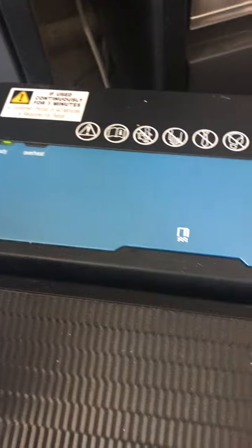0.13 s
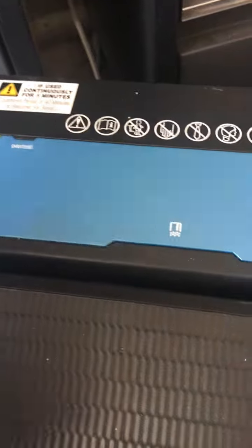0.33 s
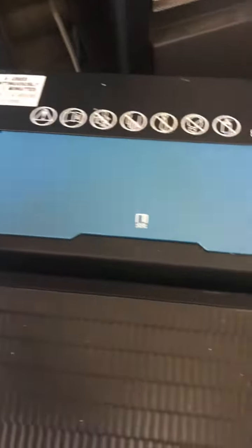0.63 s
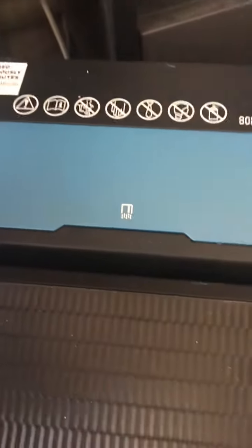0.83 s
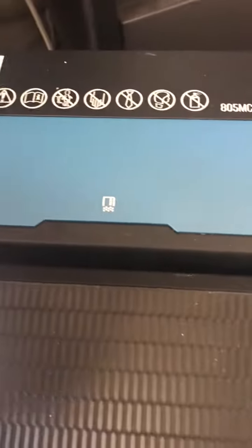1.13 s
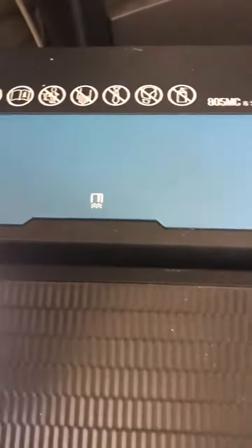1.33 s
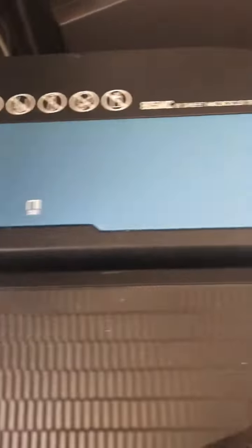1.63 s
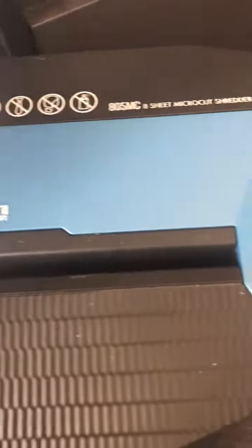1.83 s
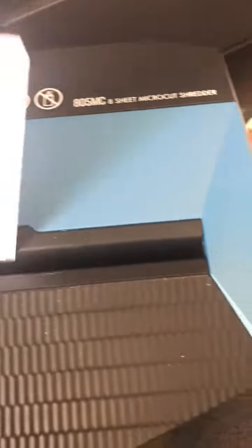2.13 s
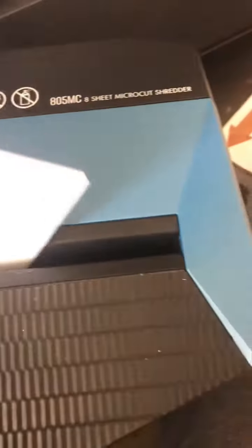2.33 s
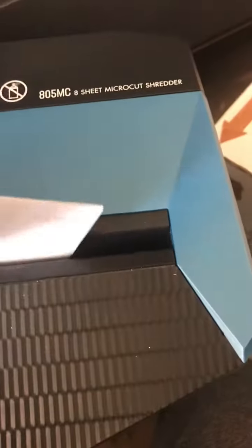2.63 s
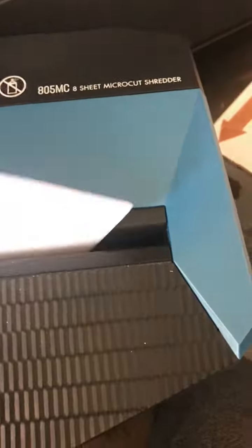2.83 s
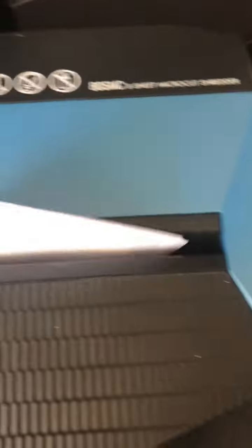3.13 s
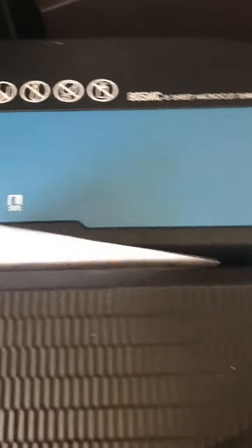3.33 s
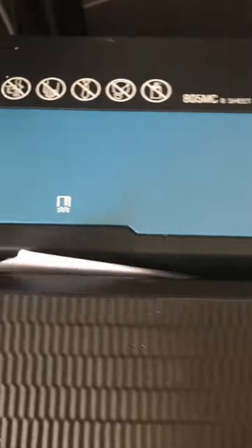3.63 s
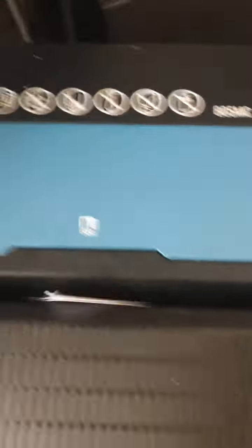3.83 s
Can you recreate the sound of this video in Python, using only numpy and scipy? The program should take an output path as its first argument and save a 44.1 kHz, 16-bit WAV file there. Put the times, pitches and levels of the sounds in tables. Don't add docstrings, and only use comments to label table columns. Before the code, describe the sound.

A sheet is rustled and slid near the microphone, then an electric shredder starts abruptly, its plastic body rattling and humming, fibres crunching and cracking, with a growing gear throb in a dry room.

```python
import sys
import numpy as np
from scipy import signal
from scipy.fft import rfft, irfft, next_fast_len
from scipy.io import wavfile
from scipy.ndimage import uniform_filter1d, map_coordinates

SR = 44100
rng = np.random.default_rng(int(sys.argv[2]) if len(sys.argv) > 2 else 0)


def waveform_to_disk(signal):
    frames = np.transpose(np.atleast_2d(signal))
    scaled = np.clip(frames, -1, 1) * 32767
    samples = np.round(scaled).astype(np.int16)
    wavfile.write(sys.argv[1], SR, samples)


def nominal_scale(level):
    x = np.asarray(level, float) / 20
    return 10 ** x


N = 176400
T = np.arange(N) / SR
START_S = 2.634
FULL_HZ = 285
SNAP_WIDE_DB, SNAP_Q = -26, 2.8


def unit(x):
    return x / np.sqrt(np.mean(x ** 2) + 1e-20)


def along(points, hz):
    f, v = np.transpose(points)
    return np.interp(np.log(hz + 1), np.log(f + 1), v)


def curves(rows):
    s, *cols = np.transpose(rows)
    return [np.interp(T, s, c) for c in cols]


def wobble(rate):
    coarse = T[::32]
    knots = rng.standard_normal(int(N * rate / SR) + 4)
    return np.interp(T, coarse, map_coordinates(knots, [coarse * rate]))


def filtered(x, response):
    m = next_fast_len(len(x) + 8192)
    return irfft(rfft(x, m) * response(np.fft.rfftfreq(m, 1 / SR)), m)[:len(x)]


def band(f, hz, width):
    return 1j * f * width / (hz * hz - f * f + 1j * f * width)


def resonances(f, modes):
    return sum((-1) ** k * nominal_scale(db) * band(f, hz, width) for k, (hz, width, db) in enumerate(modes))


def grit(rate, spread_db, share):
    size_db = spread_db * np.minimum(rng.exponential(size=N), 2.5)
    hits = (rng.random(N) < rate / SR) * nominal_scale(size_db) * rng.uniform(-1.03, 1, N)
    share = np.clip(share, 0, 1)
    return np.sqrt(share) * unit(hits) + np.sqrt(1 - share) * rng.standard_normal(N)


def patchy(x, bins, frames):
    z = signal.stft(x, nperseg=256)[2]
    field = uniform_filter1d(uniform_filter1d(rng.standard_normal(z.shape), bins, 0), frames, 1)
    return unit(signal.istft(z * nominal_scale(2.6 * unit(field)), nperseg=256)[1][:N])


def clicks(rows, wide_db, q):
    lag_s = .0009
    out, t = np.zeros(N + SR), np.arange(SR // 10) / SR
    for (s, db, hz, t60), noise in zip(rows, rng.standard_normal((len(rows), len(t)))):
        def colour(f):
            ring = nominal_scale(wide_db) + band(f, hz, hz / q)
            low_cut = 1j * f / (1j * f + .5 * hz)
            high_cut = 1 / (1 + 1j * f / (2 * hz))
            return ring * (low_cut * high_cut) ** 2

        burst = filtered(noise * nominal_scale(-60 * t / max(t60, .002)), colour)
        out[round((s + lag_s) * SR):][:len(t)] += nominal_scale(db) * burst / np.abs(burst).max()
    return out[:N]


def hum():
    # f/Hz, density/dB
    rumble_curve = [(15, -17), (30, -20), (48, 0.5), (96, -9.5), (124, -9.5), (395, -21), (900, -30.5),
                    (1170, -23), (1980, -120)]
    # f/Hz, rms level/dB
    fan_tones = [(75.4, -59), (123, -68)]
    rumble = unit(filtered(rng.standard_normal(N), lambda f: nominal_scale(along(rumble_curve, f))))
    out = nominal_scale(-56.5 + 3.4 * wobble(4.47)) * rumble
    for hz, db in fan_tones:
        out = out + np.sqrt(2) * nominal_scale(db + 3.5 * wobble(6.09)) * np.sin(2 * np.pi * hz * T)
    return out


def rustle():
    # peak t/s, width/s, level/dB, brightness centre f/Hz
    strokes = [(0.191, 0.038, -53, 6700.0), (0.258, 0.044, -56, 3240), (0.396, 0.035, -42.5, 6700),
               (0.487, 0.09, -37.5, 5450), (0.645, 0.053, -47, 7100.0), (0.711, 0.011, -53, 5300.0),
               (0.751, 0.032, -72, 5100.0), (0.923, 0.09, -35.5, 6500), (1.12, 0.09, -42.5, 6750),
               (1.198, 0.019, -46, 4300.0), (1.264, 0.03, -43, 5000), (1.374, 0.068, -47.5, 7600.0),
               (1.454, 0.033, -48.5, 7040), (1.555, 0.02, -67, 3500.0), (1.694, 0.09, -40, 7700.0),
               (1.796, 0.035, -50.5, 7100.0), (1.94, 0.09, -48.5, 6100.0), (2.025, 0.022, -50, 5600.0),
               (2.155, 0.037, -50.5, 4800.0), (2.281, 0.026, -61, 7600.0), (2.371, 0.03, -54.5, 8000.0),
               (2.45, 0.016, -71, 7800.0), (2.504, 0.021, -54, 6940), (2.605, 0.025, -53, 6700.0)]
    more_strokes = [
        (.44, 0.17, -53.5, 3430),
        (.55, 0.025, -54, 4500),
        (.8, 0.098, -63.5, 5000),
        (1.55, 0.067, -59.5, 2500),
        (1.89, 0.066, -46, 4200),
        (1.98, 0.047, -46.5, 6000),
        (2.1, 0.011, -60.5, 12000),
        (2.42, 0.1, -56.5, 7700),
        (2.549, 0.11, -44, 7050),
        (2.65, 0.058, -49.5, 6950),
    ]
    # f/Hz, density/dB
    sheet_curve = [(200, -20), (400, -15), (777, -10.5), (1310, 2), (1840, -2), (2880, -2), (12500, -5),
                   (16000, -9)]
    widest_s, fall_over_rise = 0.048, 0.86
    base = filtered(grit(2500, 4.6, share=0.17), lambda f: nominal_scale(along(sheet_curve, f)))
    base = patchy(base, bins=6, frames=24) * nominal_scale(1.88 * wobble(60))
    out = nominal_scale(-64.5 + 0.15 * wobble(5.8)) * base
    for s, width, db, hz in [(s, min(w, widest_s), db, hz) for s, w, db, hz in strokes] + more_strokes:
        a, b = int((s - .15) * SR), int((s + 0.16) * SR)
        t = (T[a:b] - s) / (0.94 * width)
        swell = np.exp(-np.where(t > 0, t / fall_over_rise, t) ** 2)
        tint = filtered(base[a:b], lambda f: nominal_scale(4 * np.exp(-np.log2((f + 1) / hz) ** 2)))
        out[a:b] += nominal_scale(db - 7) * swell * unit(tint)
    return out


def ticks():
    # t/s, peak level/dB, ring f/Hz, t60/s
    buckles = [
        (0.256, -31.5, 530, 0.012),
        (0.889, -29, 2580, 0.0088),
        (1.194, -31.5, 3130, 0.0066),
        (1.372, -35, 10000, 0.021),
        (1.395, -38, 1140, 0.021),
        (1.88, -43, 1430, 0.0077),
        (2.15, -36.5, 3930, 0.016),
        (2.17, -41, 301, 0.0098),
        (2.277, -39.5, 7360, 0.019),
    ]
    # t/s, peak level/dB, ring f/Hz, t60/s
    bodies = [(.2575, -30, 2000, .015), (.2575, -32, 5000, .012), (.249, -40, 3500, .03),
              (.347, -46, 1100, .015), (.668, -44, 2200, .015), (2.466, -44, 1300, .07),
              (3.0582, -2, 11500, .006), (3.059, -11, 1700, .03), (3.0588, -8, 6500, .008),
              (3.1195, -12, 8000, .005), (3.8595, -8, 13000, .006)]
    return clicks(buckles, wide_db=-10, q=2.2) + clicks(bodies, SNAP_WIDE_DB, SNAP_Q)


def thump():
    # t/s, level/dB, f/Hz, hold/s, t60/s
    bumps = [
        (0.652, -52.5, 210, .01, .04),
        (2.171, -40.5, 166, 0.029, 0.015),
        (2.468, -50, 230, 0.013, 0.054),
        (2.641, -22.5, 314, 0.0048, 0.023),
    ]
    out = 0
    for s, db, hz, hold, t60 in bumps:
        t = np.clip(T - s, 0, None)
        fall_db = -60 * np.clip(t - hold, 0, None) / t60
        out = out + nominal_scale(db + fall_db) * (1 - np.exp(-t / 0.0012)) * np.sin(2 * np.pi * hz * t)
    return out


def housing(f):
    # f/Hz, width/Hz, level/dB
    shell_modes = [(428, 42, -13), (955, 29, 1), (1111, 93, -3.5), (1370, 38, 2), (2165, 150, -17.5),
                   (2480, 23, -9), (2884, 48, -15.5), (3244, 85, -5.5), (4073, 105, -9), (5900, 130, -13)]
    return resonances(f, shell_modes)


def shaft_whine(turn, shaft_hz, gear):
    # multiple of shaft speed, level/dB, change during run-up/dB
    orders = [(2, 7, -2), (4, -2, 3), (5, -9, -3), (8, 1, 6), (10, -8, 1), (11, -1, -4), (12, 1, -4),
              (20, -3, -6)]
    grid = np.arange(1, 8000, 5.)
    lift = np.abs(housing(grid))
    run_up = np.exp(-((T - 2.83) / .09) ** 4)
    out = 0
    for k, db, surge_db in orders:
        level = nominal_scale(db + surge_db * run_up + 1.8 * wobble(14) + 1.5 * wobble(60))
        if k == 5:
            level = level * gear
        tone = np.sin(round(k) * turn + rng.uniform(0, 2 * np.pi))
        out = out + level * tone * (nominal_scale(-23) + np.interp(round(k) * shaft_hz, grid, lift))
    return out


def gear_shake(speed, gear, ripple, ripple_depth):
    # f/Hz, density/dB
    gear_curve = [(35, -50), (70, -21.5), (186, 0), (504, -11), (1140, -8), (1840, -16), (3270, -18.5),
                  (5000, -36), (6500, -42), (11000, -120)]
    # f/Hz, width/Hz, level/dB
    bin_modes = [(175, 46, -4.5), (244.5, 6.2, 5.5), (325, 17, -6.5), (410, 15, -1.5), (445, 15, -9),
                 (678, 13, -3.5)]
    knocks = grit(900, 3, share=0.54) * (1 + ripple_depth * ripple)
    body = unit(filtered(knocks, lambda f: nominal_scale(along(gear_curve, f))))
    body = body + nominal_scale(-0.5) * speed ** 2 * unit(filtered(knocks * gear, housing))
    body = body + nominal_scale(-2) * unit(filtered(knocks, lambda f: resonances(f, bin_modes)))
    boom = unit(filtered(knocks, lambda f: band(f, 159, 200) ** 2))
    shake = nominal_scale(0.68 * wobble(18) + 0.53 * wobble(70)) * unit(body)
    shake = shake + nominal_scale(-18 + 3 * wobble(7)) * boom
    return shake + nominal_scale(-15 + 3.1 * wobble(9)) * ripple


def singing_shell(load, speed, gear):
    # f/Hz, level over the housing/dB, share of the gear beat
    singing_modes = [(1385, -7, 1)]
    out = 0
    for hz, db, beat in singing_modes:
        level = (1 + beat * (gear - 1)) * nominal_scale(db + 1.3 * wobble(29.94))
        out = out + level * np.sin(2 * np.pi * hz * np.cumsum(1 + .004 * wobble(40)) / SR)
    return load * speed ** 4 * out


def motor():
    # t/s, shaft speed/Hz, housing level/dB, unbalance level/dB, whine level/dB
    run = [(2.64, 92, -36, -41, -57), (2.67, 130, -34, -24.5, -42), (2.71, 190, -33, -25.5, -37),
           (2.745, 228, -30, -38, -32), (2.81, 264, -35, -22, -27.5), (2.9, 284, -32, -40.5, -40),
           (3.08, 296, -32, -40, -34.5), (3.3, 291, -32, -38, -34.5), (3.55, 284, -30.5, -38, -33.5),
           (3.75, 278, -30.5, -30.5, -30), (3.93, 273, -31.5, -29, -30.5), (4, 274, -29, -28.5, -31.5)]
    # t/s, share 0-1
    grip = [(3.3, .35), (3.75, 1)]
    mains_hz, ripple_depth = 120, .12
    gear_ratio, gear_peak_s, gear_depth = 11, 3.876, .75
    shaft_hz, body_db, spin_db, whine_db = curves(run)
    load, = curves(grip)
    speed = shaft_hz / FULL_HZ
    turn = 2 * np.pi * np.cumsum(shaft_hz * (1 + .0015 * wobble(30))) / SR
    wheel = (turn - turn[round(gear_peak_s * SR)]) / gear_ratio
    gear = 1 + gear_depth * load * np.cos(wheel)
    ripple = np.sin(2 * np.pi * mains_hz * T)
    whine = nominal_scale(whine_db) * shaft_whine(turn, shaft_hz, gear)
    unbalance = nominal_scale(spin_db + 1.8 * wobble(24)) * np.sin(turn)
    shake = gear_shake(speed, gear, ripple, ripple_depth) + singing_shell(load, speed, gear)
    sound = (whine + unbalance) * (1 + ripple_depth * ripple) + nominal_scale(body_db) * shake
    return sound * np.clip((T - START_S) / 0.004, 0, 1)


def crunch():
    # t/s, level/dB
    cutter_load = [(2.64, -48), (2.72, -43), (2.85, -38), (3.04, -35.5), (3.5, -34.5), (4, -35)]
    # f/Hz, density/dB
    shred_curve = [(880, -23), (1500, -8.5), (1900, -15), (3300, -6), (4870, -10), (16000, -13)]
    load_db, = curves(cutter_load)
    fibres = grit(900, 0, share=nominal_scale(-7) ** 2) * nominal_scale(.9 * wobble(60))
    fibres = patchy(filtered(fibres, lambda f: nominal_scale(along(shred_curve, f))), bins=3, frames=14)
    return nominal_scale(load_db + 3.0) * fibres * np.clip((T - START_S) / 0.029, 0, 1)


def snaps():
    # t/s, peak level/dB, ring f/Hz, t60/s
    cracks = [(2.8933, -19.5, 4050, 0.0094), (2.9124, -14.5, 5900, 0.022), (2.9306, -16, 6050, 0.012),
              (3.0576, -8.5, 4330, 0.018), (3.1264, -6.5, 7600, 0.014), (3.1508, -12, 5200, 0.0086),
              (3.2665, -20, 5800, 0.012), (3.3114, -16, 8900, 0.0049), (3.348, -20, 6000, .005),
              (3.4227, -21, 9000, .005), (3.3729, -10.5, 6700, 0.0086), (3.4375, -14, 9600, 0.01),
              (3.568, -16.5, 12000, .006), (3.5965, -8, 7200, 0.009), (3.612, -22, 11000, 0.0055),
              (3.6492, -18.5, 7940, .005), (3.7461, -7.5, 11400, 0.0064), (3.8926, -17, 6000, 0.0049),
              (3.8593, -8, 8500, 0.0072)]
    return clicks(cracks, SNAP_WIDE_DB, SNAP_Q)


def squeak():
    # t/s, level/dB, f/Hz, length/s
    slips = [
        (2.962, -34, 4700, .03),
        (3.001, -37, 4590, .03),
    ]
    fall_hz_per_s = 1500
    out = 0
    for s, db, hz, length in slips:
        t = T - s
        level = nominal_scale(db + 7 * wobble(250)) * np.exp(-(t / (.5 * length)) ** 2)
        out = out + level * np.sin(2 * np.pi * (hz - .5 * fall_hz_per_s * t) * t)
    return out


def room(x):
    # f/Hz, t60/s
    decay = [(200, 0.38), (2000, 0.073), (12000, 0.037)]
    hz, t, z = signal.stft(rng.standard_normal(SR // 3), SR, nperseg=256)
    tail = signal.istft(z * nominal_scale(-60 * t / along(decay, hz)[:, None]), SR, nperseg=256)[1]
    return signal.fftconvolve(np.pad(x, (150, 0)), tail / np.linalg.norm(tail))[:N]


def scene():
    near = rustle() + ticks() + thump() + motor() + crunch() + snaps() + squeak()
    return (near + nominal_scale(-14.5) * room(near) + hum())[None]


def top_cut(x):
    return signal.sosfilt(signal.butter(12, 17010, fs=SR, output="sos"), x)


def record(dry):
    top_hz, end_hz, gate_db = 15850, 16800, -36
    open_s, fade_s = .082, 0.004
    low = filtered(dry[0], lambda f: f < top_hz)
    top = filtered(dry[0], lambda f: f < end_hz) - low
    loud = uniform_filter1d(np.abs(top), size=64) > nominal_scale(gate_db)
    gate = np.clip(4 * uniform_filter1d(1. * loud, size=256), 0, 1)
    mix = (low + gate * top) * np.clip((T - open_s) / fade_s, 0, 1)
    return top_cut(mix[None])


dry = scene()
out = record(dry)
waveform_to_disk(out)
```